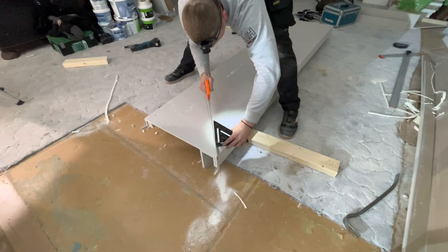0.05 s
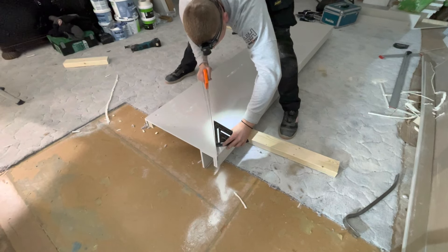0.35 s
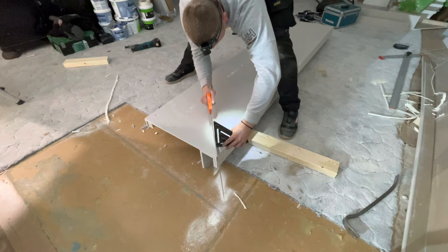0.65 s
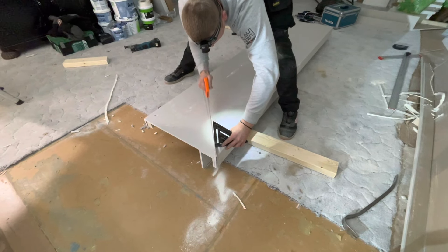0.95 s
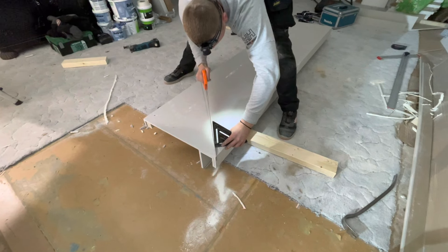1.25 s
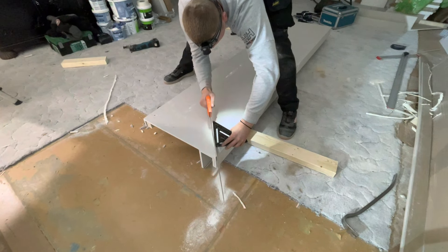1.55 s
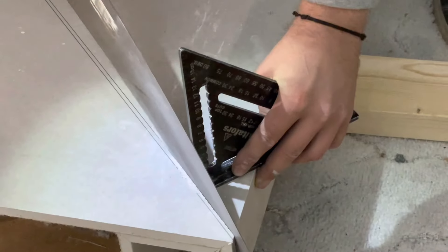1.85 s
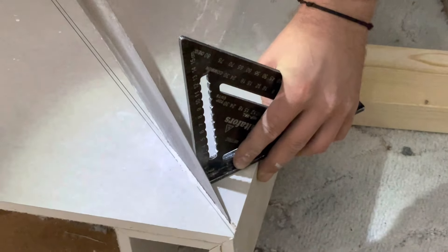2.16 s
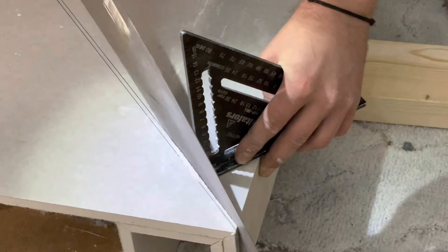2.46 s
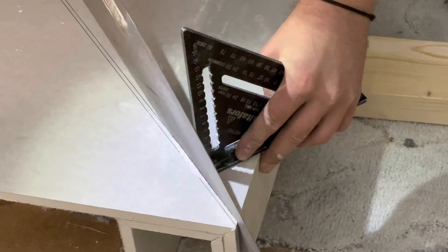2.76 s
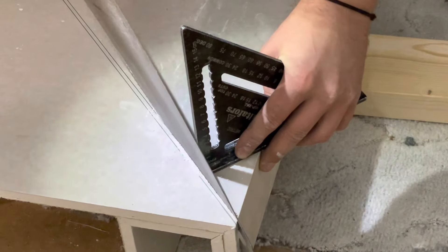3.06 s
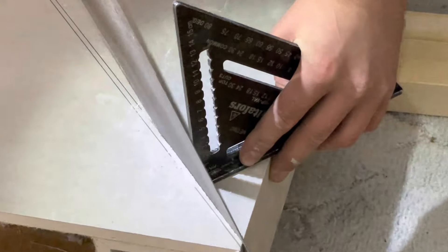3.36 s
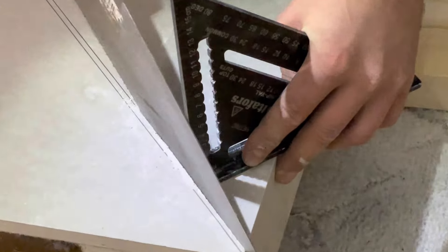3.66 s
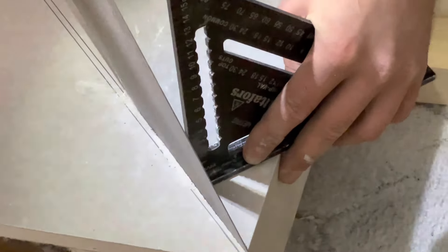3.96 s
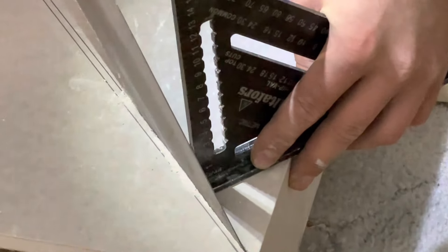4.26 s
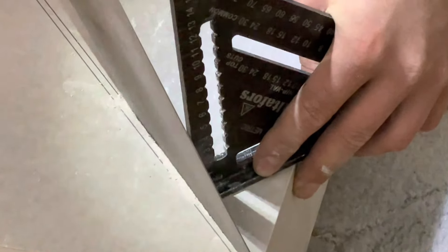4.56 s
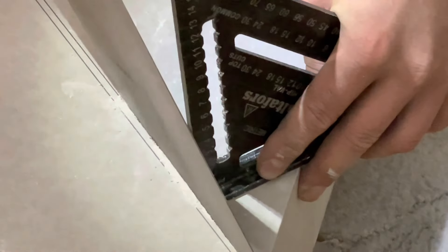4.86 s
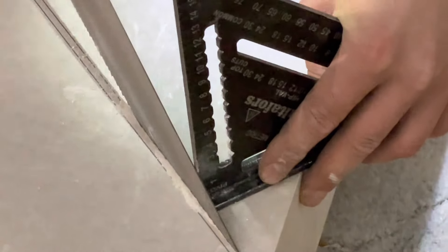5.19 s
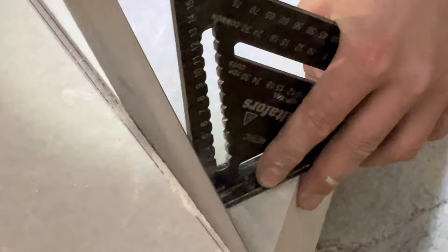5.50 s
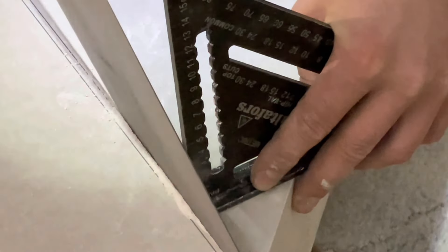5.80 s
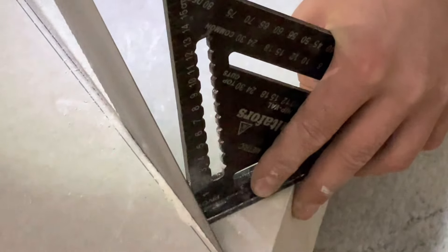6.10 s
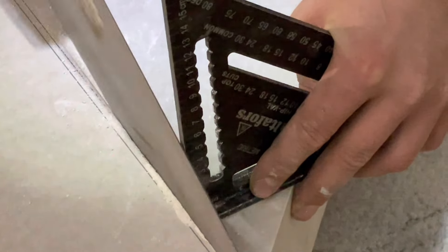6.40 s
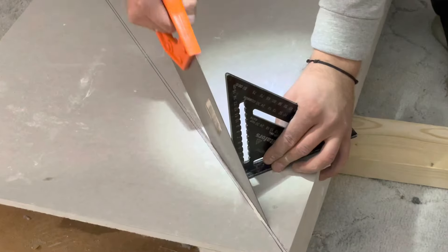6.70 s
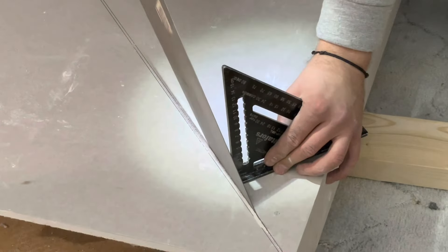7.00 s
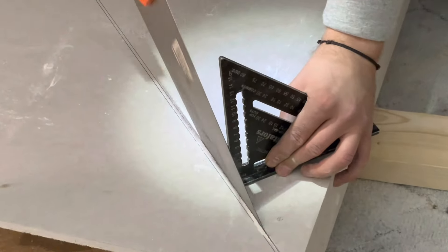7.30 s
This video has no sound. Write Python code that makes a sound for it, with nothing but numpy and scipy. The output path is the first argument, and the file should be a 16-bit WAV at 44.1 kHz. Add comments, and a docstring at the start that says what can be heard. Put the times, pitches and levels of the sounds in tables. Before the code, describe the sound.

A hand saw cuts plasterboard in even strokes, a gritty, hissing rasp over the hollow drumming of the shaking board.

```python
"""A bare room: a hand saw cuts plasterboard in even push and pull strokes.
The teeth grind gypsum into a dense rasp with a bright hiss; the blade rings and chirps in the kerf.
Their catching shakes the propped board, which drums, thumps, booms and flexes.
Heard from three places in turn (across the room, by the blade, a step back), with brief gaps between."""
import sys
import numpy as np
from scipy import signal
from scipy.fft import rfft, irfft
from scipy.io import wavfile
from scipy.ndimage import uniform_filter1d

SR = 44100
rng = np.random.default_rng(int(sys.argv[2]) if len(sys.argv) > 2 else 0)


def wrap_up_sound(samples):
    """Save the sound to the file named by the first command line argument, as 16-bit audio."""
    columns = np.atleast_2d(samples).T
    # keep every value between -1 and 1, then stretch to whole-number steps
    tamed = np.clip(columns, -1, 1)
    steps = np.round(tamed * 32767).astype(np.int16)
    wavfile.write(sys.argv[1], SR, steps)


N = 328104
TIME_S, BINS_HZ = np.arange(N) / SR, np.fft.rfftfreq(N, 1 / SR)

# Room decay. Each row: frequency in Hz, T60 in seconds.
ROOM_T60 = [(100, 0.78), (500, 0.23), (3000, 0.099), (8000, 0.076), (15000, 0.18)]
# Listening places: far, close, a step back. Each row: start in seconds, end in seconds.
PLACE_SPANS = [(-.02, 1.619), (1.629, 6.543), (6.551, 7.46)]
# Stereo width: how much left and right differ. Each row: frequency in Hz, then dB re direct sound far, close
# and a step back.
STEREO_WIDTH = [(40, -22, -34, -28), (110, -12.5, -19, -27), (200, -9.5, -13.5, -14), (380, -7, -15, -11),
                (684, -1, -4.5, -5), (1300, 1, -9, -11), (2130, -1, -44, -35), (4270, 0.5, -11.5, -8),
                (8100, 0.5, -12, -22), (11400, 3, -11, -9), (13000, -42, -33, -27), (16000, -37, -31, -22)]
# From the close and step-back places, treble arrives out of step between left and right. Each row: frequency in
# Hz, left-right phase in radians.
STEREO_PHASE = [(1000, 0), (5000, .1), (5800, 1), (6900, 1.1), (7800, 2.3), (8400, 2.95), (9500, 3.3),
                (10000, 4.1), (12500, 5.6), (13400, 6.28)]
# Slow flexing of the sheet. Each row: frequency in Hz, gain in dB.
FLEX_SPECTRUM = [(10, -40), (25, -21), (34, -3), (43, 5), (52, -1.5), (61, 8.5), (70, 1), (100, -16),
                 (140, -36), (600, -100)]
# Board bending modes. Each row: frequency in Hz, width in Hz, push gain in dB, pull gain in dB.
BOARD_MODES = [(176, 15, -3, -21), (203.3, 19.5, 1.5, 1), (229.1, 18.7, 5.5, 5), (253.8, 59, -0.5, -6),
               (314.6, 22.3, 2, 0), (371, 65, -6, -9), (419.6, 19.5, -2.5, 0.5), (478.3, 17.7, -0.5, -3.5),
               (517.3, 7, -15, -2.5), (657, 36, -30, -51), (682.6, 15, -1.5, -8), (856, 45, -11, -10.5),
               (967, 62, -20, -8)]
# Single-mode booms. Each row: centre in seconds, length in seconds, frequency in Hz, dB re drumming.
BOARD_BOOMS = [(0.127, 0.11, 208, 0), (.14, 0.087, 423.5, -3), (1.086, 0.078, 414, -1),
               (1.089, 0.074, 509, 0), (1.137, 0.26, 234, -0.5), (1.143, 0.17, 325, 0),
               (2.069, 0.13, 229.1, -1), (2.443, 0.084, 387.6, -2.5), (2.958, .14, 229.8, 3),
               (3.888, 0.093, 228.5, 6), (4.153, 0.17, 231.7, 1), (5.932, 0.079, 432.3, -1.5),
               (6.958, .18, 225.5, -7), (6.975, 0.1, 519, -6.5), (6.975, 0.11, 880, -10.5),
               (7.26, 0.19, 238, 0)]
# Chirps in the kerf. Each row: centre in seconds, length in seconds, level in dB.
KERF_CHIRPS = [(3.299, .016, -50), (4.881, .004, -28), (5.749, 0.0058, -27)]
# Blade modes. Each row: frequency in Hz, width in Hz, gain in dB re grinding.
BLADE_MODES = [(1124, 82, -9.5), (1340, 39, -11), (1602, 49, -5), (2040, 73, -13), (2900, 41, -16),
               (5115, 150, -2.5), (6700, 370, -6.5)]
# Grinding gypsum. Each row: frequency in Hz, then gain in dB far, close and a step back.
GRIND_SPECTRUM = [(100, -28, -28, -27), (450, -2, 4, 4), (664, -0.5, 4, 7), (1010, 3.5, 0.5, 1),
                  (1400, 1, -0.5, 1.5), (2050, 4, -0.5, 1.5), (2520, 3, -0.5, -0.5), (3650, 0.5, -2, -0.5),
                  (5600, -3, -6, -9), (7900, -3.5, -5, -4.5), (8150, 2, -6.5, -7),
                  (10850, -8.5, -5.5, -3.5), (12200, -6, -7, -5), (13400, -2, -1.5, 1),
                  (15900, -7.5, -7.5, -5)]
# Strokes. Each row: start in seconds, length in seconds, fastest point as a share of the length,
# push share (0 is pull), rasp in dB, hiss in dB, drumming in dB before trim, catches per second at
# full speed, judder in dB re crumbling, flex in dB, thump in dB re drumming before trim.
SAW_STROKES = [(-.092, 0.4, 0.37, 0.16, -38, -41.5, -30, 106, -2, -45, -8),
               (0.319, 0.45, 0.53, 1, -35.5, -39, -30.5, 76, -6.5, -41, -7),
               (0.777, 0.4, 0.44, .3, -38, -41, -28.5, 107.5, -2, -42, -8.5),
               (1.198, .429, .56, 0.41, -34, -38.1, -29.5, 72, -4, -40, -10),
               (1.611, 0.083, 0.4, 0.38, -45.2, -42, -34, 69, -6, -41, -3),
               (1.73, 0.47, 0.48, 0.089, -41, -38, -35.5, 77, -7.5, -43.5, -23),
               (2.201, 0.38, .52, 1, -35.5, -32.5, -28.5, 94, -2.5, -43.5, -17),
               (2.633, 0.49, 0.45, 0.047, -43.5, -41.5, -36, 81, -7, -46, -11),
               (3.262, 0.42, 0.59, 0.99, -37, -35.5, -31.5, 83, -7.5, -39.5, -19),
               (3.727, 0.48, 0.39, 0.012, -42.5, -40.5, -36, 82, -8.5, -44.5, -7.5),
               (4.221, 0.52, 0.69, 1, -36.5, -36, -30.5, 78, -10, -43, -7.5),
               (4.774, 0.42, .44, 0, -40, -37.6, -33.5, 80, -9, -45.5, -18),
               (5.221, .413, .55, 0.82, -35, -34, -30, 76, -4, -38.5, 1),
               (5.667, 0.39, 0.5, 0.013, -38, -36, -31.5, 85.4, -5.5, -46.5, -20),
               (6.087, 0.38, .55, 1, -34, -32, -26.4, 72, -10, -41, -11.5),
               (6.53, 0.23, .26, 0.97, -29.5, -31.5, -25.5, 74, -4.5, -39, -3.5),
               (6.787, .32, 0.45, 0.0094, -38.5, -39, -27.5, 76, -2.5, -43, -9.5),
               (7.121, 0.28, .63, .55, -31.5, -32, -25.5, 82, -7.5, -39.5, -15)]


def amp(db):
    return 10 ** (np.asarray(db) / 20)


def unit_rms(x):
    return x / np.sqrt(np.mean(x ** 2) + 1e-20)


def lookup(table, hz=BINS_HZ, column=1):
    """One table column, interpolated over log frequency."""
    columns = np.transpose(table)
    return np.interp(np.log(hz + 1), np.log(columns[0] + 1), columns[column])


def filtered(x, gain):
    return irfft(rfft(x) * gain, N)


def resonance(hz, width_hz):
    """One damped mode, unity at its peak."""
    return 1j * BINS_HZ * width_hz / (hz ** 2 - BINS_HZ ** 2 + 1j * BINS_HZ * width_hz)


def band_rms(stereo, low_hz, high_hz):
    return np.std(filtered(stereo.mean(0), (BINS_HZ > low_hz) & (BINS_HZ < high_hz)))


def swell(centre_s, length_s):
    return np.cos(np.pi * np.clip((TIME_S - centre_s) / length_s, -.5, .5))


def room_echoes(x, density=0.1):
    """Sparse wall reflections of random sign, different in each channel."""
    taps = rng.choice([-1., 1.], (2, SR // 2)) * (rng.random((2, SR // 2)) < density)
    hz, delay_s, spectra = signal.stft(taps, SR, nperseg=128)
    decay = amp(-60 * delay_s / lookup(ROOM_T60, hz)[:, None])
    decay /= np.linalg.norm(decay, axis=1, keepdims=True)
    tail = signal.istft(spectra * decay, SR, nperseg=128)[1]
    return signal.fftconvolve(x[None], tail / np.linalg.norm(tail[0]), axes=1)[:, :N]


def heard_from(x, place, frame_samples):
    """Direct sound plus a part that differs between left and right, its phases changing as the saw moves."""
    spectra = signal.stft(x, nperseg=frame_samples)[2]
    spectra *= np.exp(2j * np.pi * rng.random(spectra.shape))
    shuffled = signal.istft(spectra, nperseg=frame_samples)[1][:N]
    side = filtered(unit_rms(shuffled) * np.std(x), amp(lookup(STEREO_WIDTH, column=1 + place)))
    lead = np.exp(.5j * lookup(STEREO_PHASE) * (place > 0))
    return np.array([filtered(x, lead) + side, filtered(x, lead.conj()) - side])


def moving_contact(x, depth_db=2.5):
    """Resonances swell and fade as the contact travels along blade and board."""
    frames = dict(nperseg=2048, noverlap=1536)
    spectra = signal.stft(x, **frames)[2]
    drift = uniform_filter1d(rng.standard_normal(spectra.shape), size=12, axis=1)
    patches = unit_rms(uniform_filter1d(drift, size=3, axis=0))
    return signal.istft(spectra * amp(depth_db * patches), **frames)[1][:N]


def steadied(x, share=0.38):
    """Steady hand pressure evens out slow swells; unit RMS."""
    power = uniform_filter1d(x ** 2, size=3500) + 1e-12
    return unit_rms(x / power ** (share / 2))


def sheet_flex(force, bite, linger=0.28):
    """The whole sheet wobbles and has not quite settled at the turn."""
    wobble = steadied(filtered(force, amp(lookup(FLEX_SPECTRUM))), share=0.54)
    return wobble * (linger + (1 - linger) * uniform_filter1d(bite, size=2500))


def prop_thump(force, hz=153, width_hz=10, cutoff_hz=400):
    """The board bounces on its props, too heavy to follow a jolt's sharp edge."""
    lowpass = 1 / (1 + (BINS_HZ / cutoff_hz) ** 4)
    return steadied(filtered(force, lowpass * resonance(hz, width_hz)))


def board_drum(force, push, cutoff_hz=900):
    """Bending modes respond differently when pressed down and when lifted."""
    lowpass = 1 / (1 + (BINS_HZ / cutoff_hz) ** 6)
    pushed = lowpass * sum(amp(db) * resonance(hz, width_hz) for hz, width_hz, db, _ in BOARD_MODES)
    pulled = lowpass * sum(amp(db) * resonance(hz, width_hz) for hz, width_hz, _, db in BOARD_MODES)
    return steadied(push * filtered(force, pushed) + (1 - push) * filtered(force, pulled))


def board_shake(force, push, thump_db, thump_trim_db=-1, boom_width_hz=12):
    """The board drums, thumps and now and then booms on one mode."""
    drum = board_drum(moving_contact(force), push)
    board = steadied(drum + amp(thump_db + thump_trim_db) * prop_thump(force), share=0.85)
    for centre_s, length_s, hz, db in BOARD_BOOMS:
        ring = filtered(force, resonance(hz, boom_width_hz) ** 2)
        ring /= np.std(ring[abs(TIME_S - centre_s) < length_s / 2])
        board += amp(db) * swell(centre_s, length_s) * ring
    return board


def blade_chirps(hz=13500, width_hz=670):
    """Steel sticks for an instant and rings high."""
    ring = unit_rms(filtered(rng.standard_normal(N), resonance(hz, width_hz) ** 2))
    return ring * sum(amp(db) * swell(centre_s, length_s) for centre_s, length_s, db in KERF_CHIRPS)


def saw_motion(lag_s):
    """Stroke index and speed (0 to 1): one skewed arch from rest to rest."""
    start_s, length_s, fastest = np.transpose(SAW_STROKES)[:3]
    stroke = np.maximum(np.searchsorted(start_s, TIME_S - lag_s) - 1, 0)
    progress = np.clip((TIME_S - lag_s - start_s[stroke]) / length_s[stroke], 0, 1)
    skew = np.log(.5) / np.log(fastest)
    return stroke, abs(np.sin(np.pi * progress ** skew[stroke]))


def stroke_gain(stroke_db, exponent, t60_s, idle_db, lag_s=0):
    """Gain follows saw speed and decays; a trace stays while the blade idles in the kerf."""
    stroke, speed = saw_motion(lag_s)
    drive = amp(stroke_db)[stroke] * speed ** exponent
    pole = np.exp(-2 * np.log(1000) / (t60_s * SR))
    energy = signal.lfilter([1 - pole], [1, -pole], drive ** 2)
    return np.sqrt(energy + amp(idle_db) ** 2)


def tooth_jolts(rate_hz, jitter=.035, spread_db=2):
    """One jolt per catch of the teeth, uneven in time and force."""
    wander = unit_rms(uniform_filter1d(rng.standard_normal(N), size=300))
    catches = np.floor(np.cumsum(rate_hz * np.maximum(1 + jitter * wander, 0)) / SR)
    return np.diff(catches, prepend=0) * amp(spread_db * rng.standard_normal(N))


def crumbs(rate_hz, spread_db):
    """Gypsum grains snap at random, a few larger than the rest."""
    size = amp(spread_db * np.minimum(rng.exponential(1, N), 4))
    return unit_rms(size * rng.choice([-1., 1.], N) * (rng.random(N) < rate_hz / SR))


def grinding(jolts, burst_s=0.0059, burst_share=0.072):
    """Dense snaps swell after each catch and ring the blade."""
    bursts = unit_rms(signal.lfilter([1], [1, -np.exp(-1 / (burst_s * SR))], jolts))
    snaps = moving_contact(crumbs(rate_hz=16000, spread_db=3))
    blade = 1 + sum(amp(db) * resonance(hz, width_hz) for hz, width_hz, db in BLADE_MODES)
    return filtered(snaps * (1 + burst_share * bursts), blade)


def sawing(board_lag_s=.029, drum_trim_db=0.5, hiss_above_hz=9000, fade_s=0.012):
    """The same teeth drive rasp, hiss and board; the board takes the load a moment late."""
    pushes, rasp_db, hiss_db, drum_db, *settings = np.transpose(SAW_STROKES)[3:]
    stroke, speed = saw_motion(board_lag_s)
    push, catch_hz, judder_db, flex_db, thump_db = (
        uniform_filter1d(column[stroke], size=1500) for column in (pushes, *settings))
    bite = speed ** .45
    jolts = tooth_jolts(catch_hz * bite)
    force = amp(judder_db) * unit_rms(jolts - jolts.mean()) + crumbs(rate_hz=3000, spread_db=1.5)
    grit = grinding(jolts)
    board = board_shake(force, push, thump_db)
    flex = amp(flex_db) * sheet_flex(force, bite)
    rasp_gain = stroke_gain(rasp_db, exponent=0.86, t60_s=0.34, idle_db=-63.5)
    hiss_gain = stroke_gain(hiss_db, exponent=0.98, t60_s=0.16, idle_db=-71)
    drum_gain = stroke_gain(drum_db, exponent=0.56, t60_s=0.31, idle_db=-53.5, lag_s=board_lag_s)
    highpass = 1 / (1 + (hiss_above_hz / (BINS_HZ + 1)) ** 10)
    mix = np.zeros((2, N))
    for place, (start_s, end_s) in enumerate(PLACE_SPANS):
        colour = amp(lookup(GRIND_SPECTRUM, column=1 + place))
        scrape = heard_from(filtered(grit, colour), place, frame_samples=256)
        hiss = filtered(scrape, highpass)
        drum = heard_from(board, place, frame_samples=2048)
        sound = rasp_gain * (scrape - hiss) / band_rms(scrape, low_hz=1000, high_hz=7000)
        sound += hiss_gain * hiss / band_rms(scrape, low_hz=10500, high_hz=16000)
        sound += amp(drum_trim_db) * drum_gain * drum / band_rms(drum, low_hz=120, high_hz=700)
        gate = np.clip(np.minimum(TIME_S - start_s, end_s - TIME_S) / fade_s, 0, 1)
        mix += (sound + flex) * gate
    return mix


def scene(room_db=-21):
    """The saw and the faint ring of the room."""
    saw = sawing() + blade_chirps()
    return saw + amp(room_db) * room_echoes(saw.mean(0))


def record(dry):
    """Steep low-pass."""
    cutoff_hz = 15900
    lowpass = signal.firwin(511, cutoff_hz, window=("kaiser", 9), fs=SR)
    return signal.oaconvolve(dry, lowpass[None], "same")


dry = scene()
out = record(dry)
wrap_up_sound(out)
```